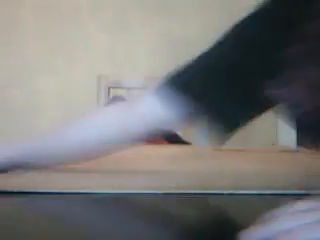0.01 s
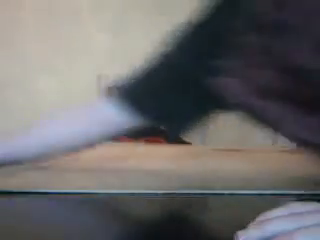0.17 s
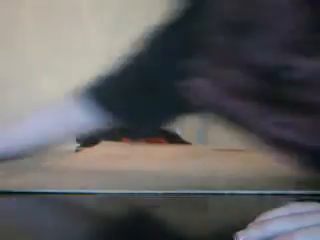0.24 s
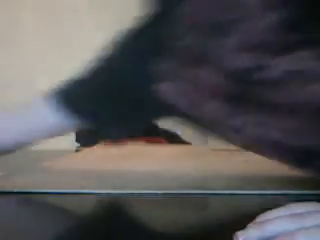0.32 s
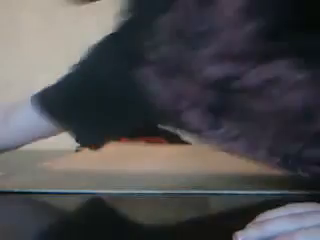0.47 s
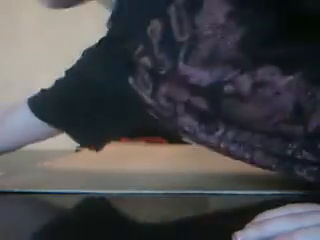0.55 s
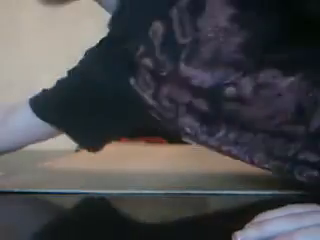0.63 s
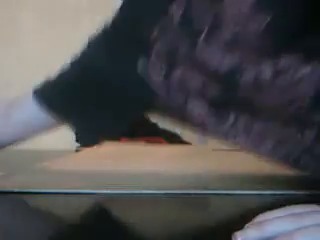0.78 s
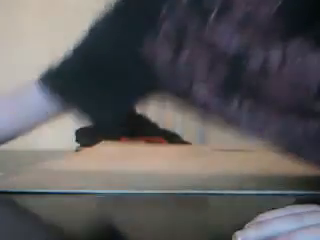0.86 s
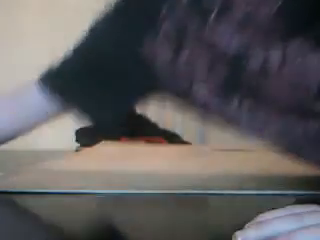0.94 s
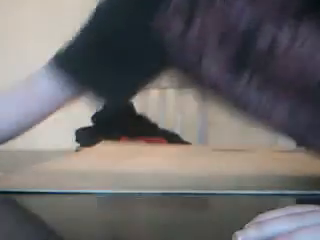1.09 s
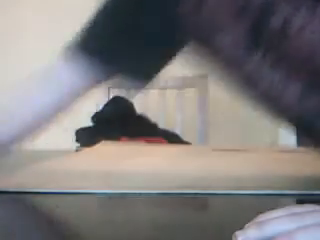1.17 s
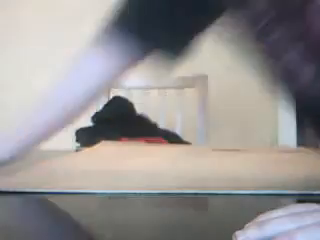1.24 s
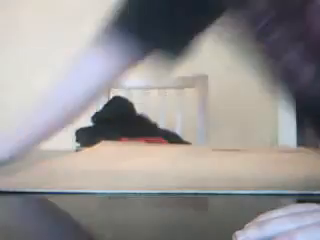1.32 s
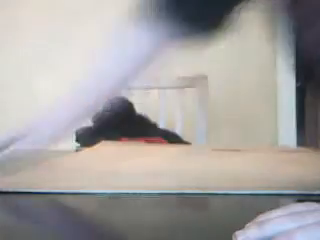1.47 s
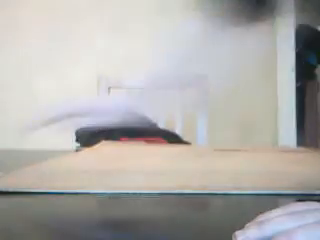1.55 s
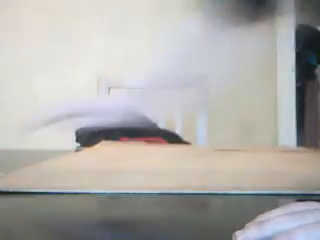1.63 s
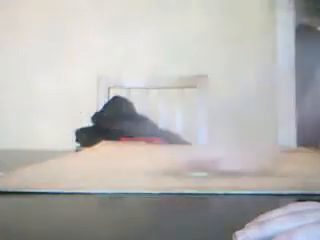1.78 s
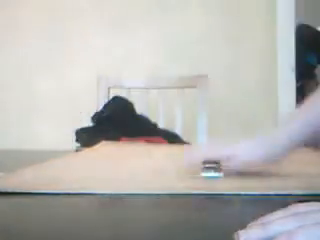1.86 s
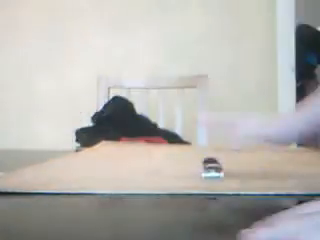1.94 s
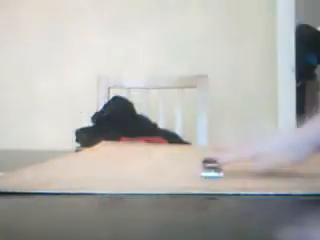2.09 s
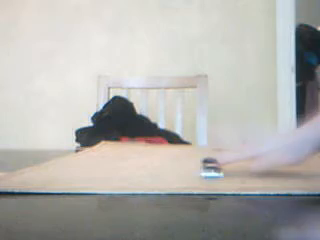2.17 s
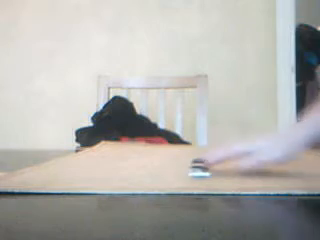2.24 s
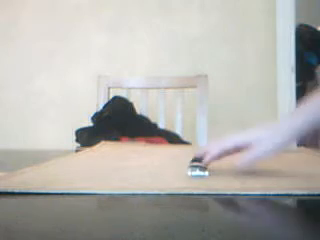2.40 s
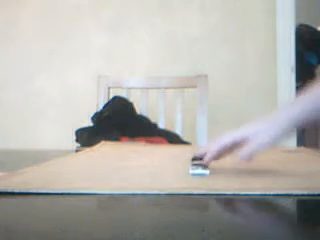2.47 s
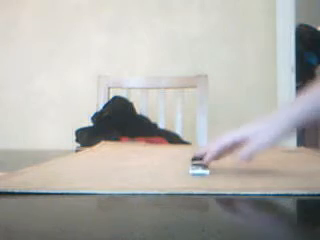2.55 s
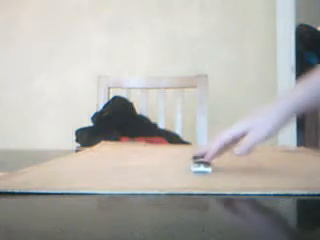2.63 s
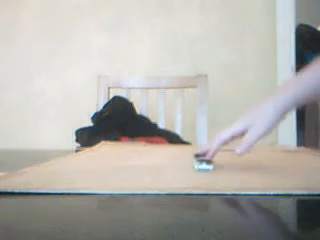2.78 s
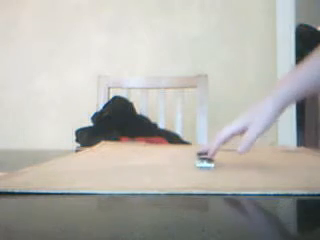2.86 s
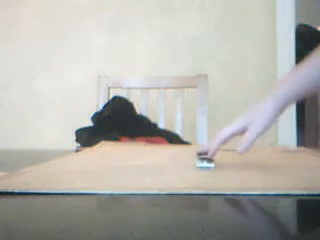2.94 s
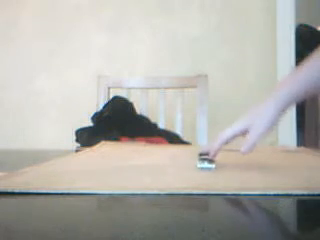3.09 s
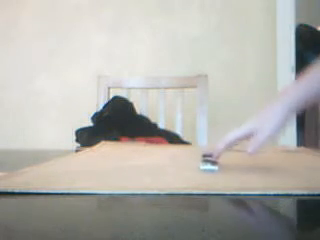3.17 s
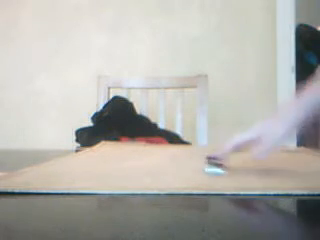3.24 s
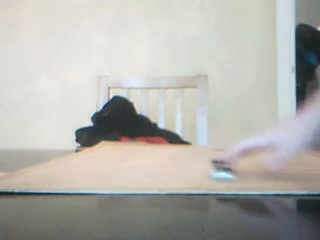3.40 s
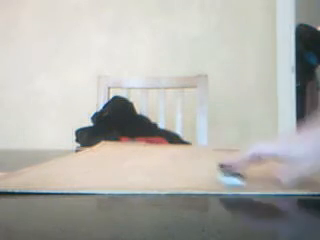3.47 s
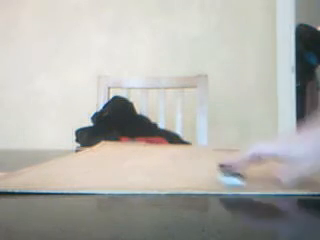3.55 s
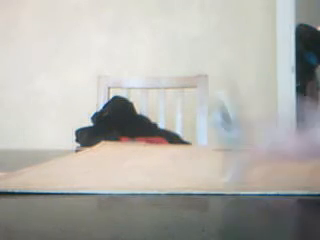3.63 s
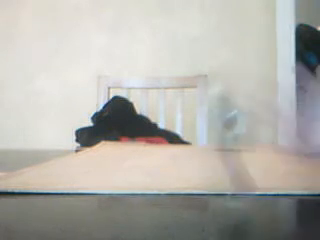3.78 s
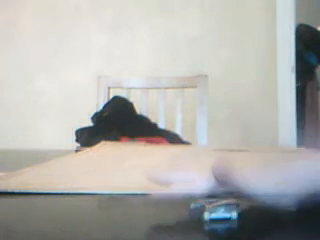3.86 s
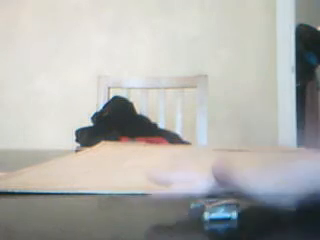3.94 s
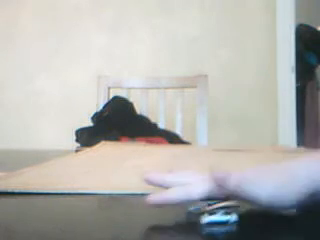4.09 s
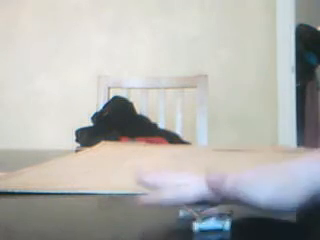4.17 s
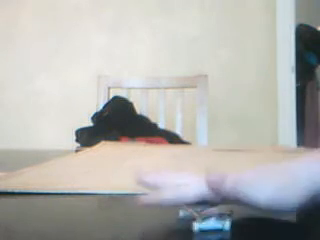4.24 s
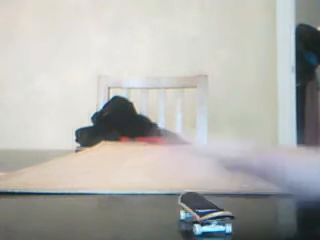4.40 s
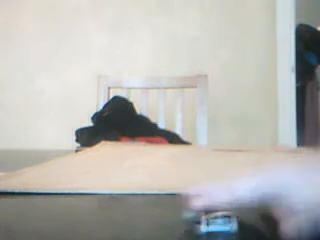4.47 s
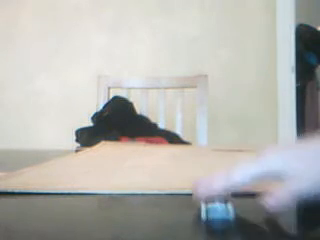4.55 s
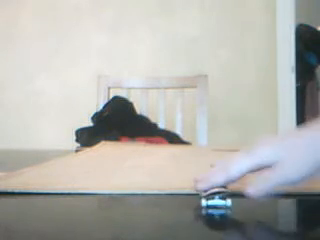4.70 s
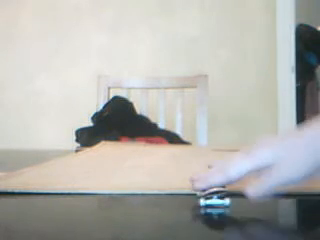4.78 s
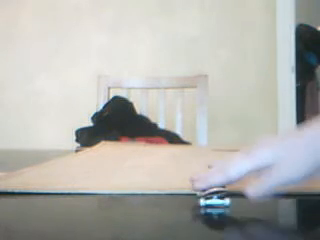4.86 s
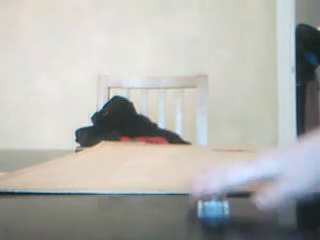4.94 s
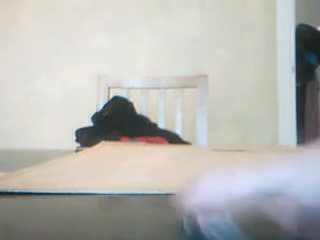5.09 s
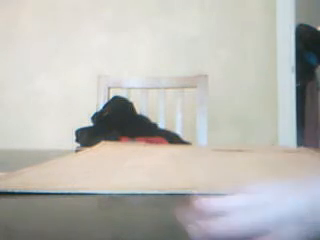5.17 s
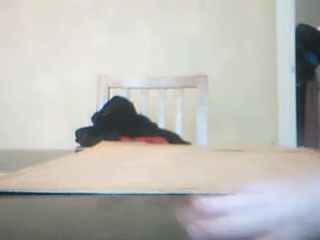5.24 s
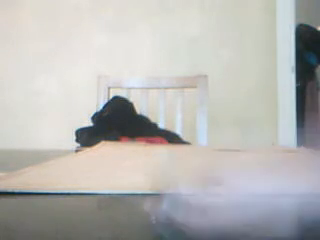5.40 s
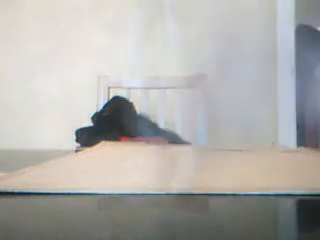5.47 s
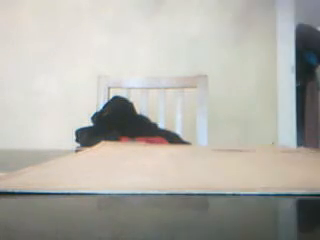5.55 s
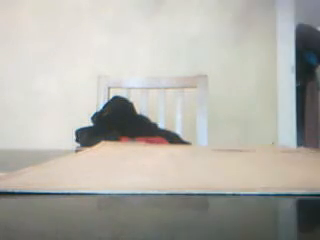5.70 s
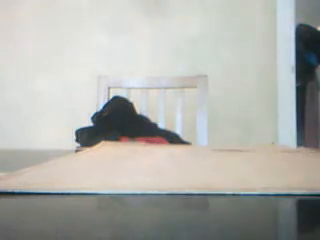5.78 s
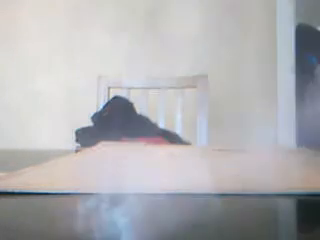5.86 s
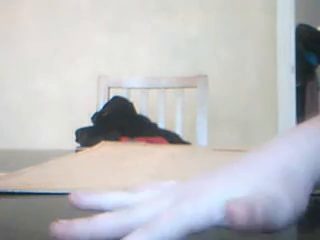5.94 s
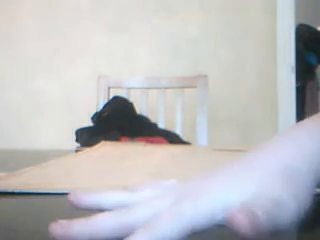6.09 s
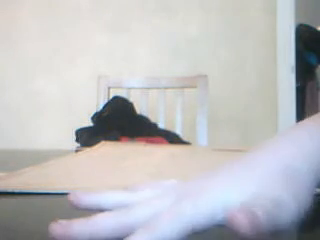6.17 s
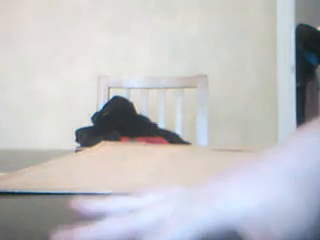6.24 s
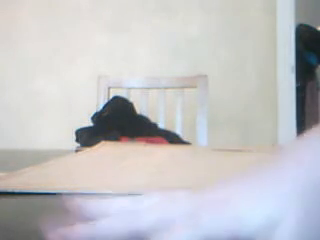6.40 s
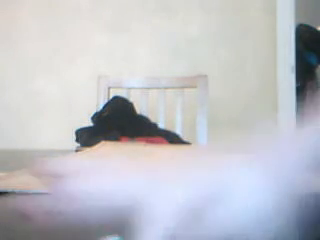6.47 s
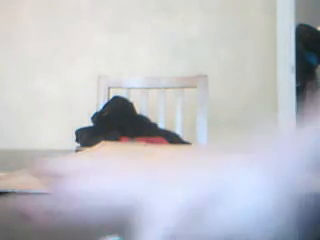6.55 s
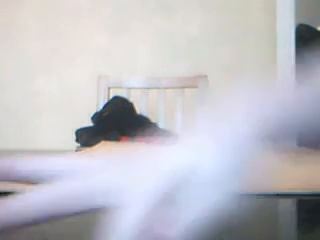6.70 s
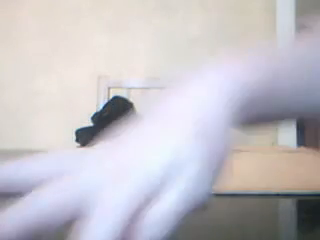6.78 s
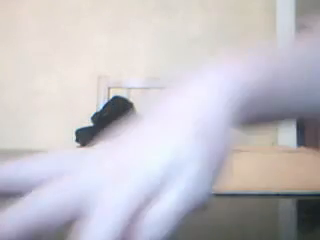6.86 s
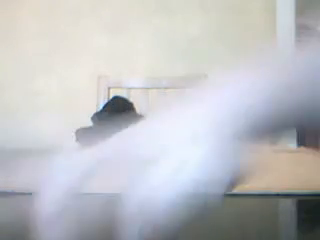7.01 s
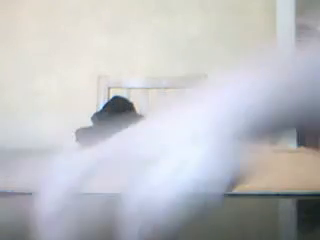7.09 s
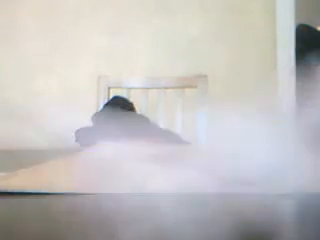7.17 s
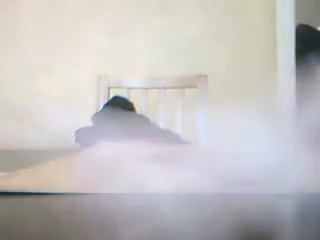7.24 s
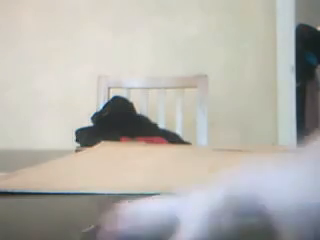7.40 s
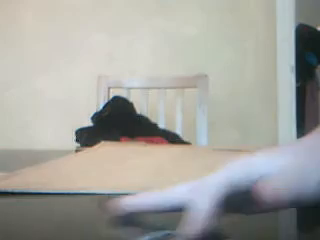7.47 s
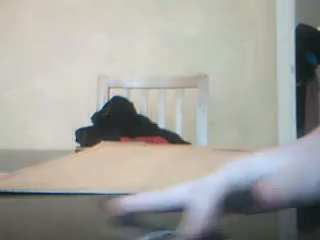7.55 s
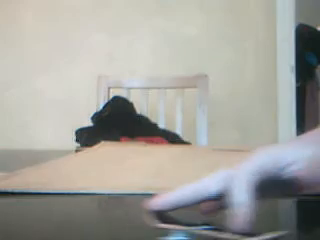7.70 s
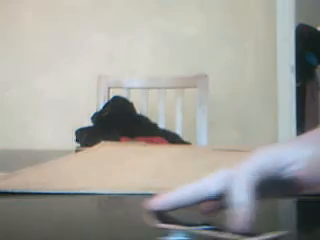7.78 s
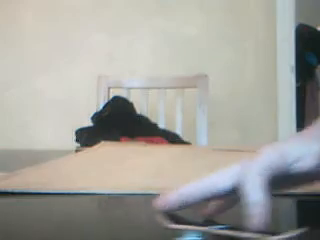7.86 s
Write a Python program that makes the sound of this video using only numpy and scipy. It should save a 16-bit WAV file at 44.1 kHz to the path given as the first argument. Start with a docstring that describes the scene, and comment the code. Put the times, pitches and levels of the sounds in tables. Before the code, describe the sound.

Small wooden toy board clacks sharply on plywood and table in a bare room, with soft wheel rubs, constant hiss and a final overloaded slam.

```python
"""A faint whine and steady hiss run throughout; early on a sleeve brushes past and a low hum swells and fades.
A toy skateboard is thrown onto plywood on a table, touched, rolled, popped and landed, then slammed down close by.
Each clack is a short bright crack with ringing wood, a table thud and the answer of a small bare room.
Hand, wheels and cloth are streams of tiny random bumps, coloured by the surface and shaped by each movement.
The little microphone adds a ring near 3 kHz to every crack and overloads on the loudest peaks."""
import sys
import numpy as np
from scipy import signal
from scipy.fft import rfft, irfft, next_fast_len
from scipy.io import wavfile

SR = 44100
rng = np.random.default_rng(int(sys.argv[2]) if len(sys.argv) > 2 else 0)


def int16_out(signal):
    """Quantize to a 16-bit WAV file."""
    q = np.round(np.clip(np.atleast_2d(signal).T, -1, 1) * 32767)
    wavfile.write(sys.argv[1], SR, q.astype(np.int16))


N = 349713
TIME = np.arange(N) / SR  # s

# steady background hiss: (frequency [Hz], relative level per Hz [dB])
AIR_COLOUR = [(30, -19), (80, -17), (200, -11), (450, -10.5), (900, -6), (1250, -7.5), (2200, -7),
              (2700, -2.5), (3130, 4), (3700, -6), (4300, -15.5), (6800, -22.5), (8000, -27),
              (10000, -54.5)]
# whine partials: (frequency [Hz], rms level before trim and flutter [dB])
WHINE_PARTIALS = [(1572, -56), (2961, -55.5), (3149, -48.5), (3564, -69.5), (3704, -60), (3795, -60)]
# room decay: (frequency [Hz], time to fall 60 dB [s])
ROOM_DECAY = [(100, 0.36), (300, 0.44), (1000, 0.4), (3000, 0.45), (6000, .37), (12000, 0.2)]
# nearest surfaces: (shortest delay [s], gain [ratio])
NEAR_ECHOES = [(.0013, 0.84), (.0068, 0.24), (.0087, .2), (0.0141, 0.08)]

# sleeve strokes; a hand touch, then wheel pushes on plywood; wheel pushes on the bare table; before trim:
# (start [s], length [s], body level [dB], hiss level [dB], growth over the stroke [dB], favoured pitch [Hz])
SLEEVE_STROKES = [(0, .07, -44, -49, -11, 980), (.62, .16, -43, -52.5, 2, 900),
                  (.745, 0.08, -43.5, -50, -1.5, 1850), (.92, 0.17, -45, -60.5, 1.5, 1900),
                  (1.375, 0.058, -72, -51.5, 4, 3000)]
PLYWOOD_STROKES = [(1.91, 0.08, -41, -49, -1, 1450), (2.42, 0.23, -43.5, -61, 3, 1250),
                   (2.86, 0.19, -44, -67, 7, 1650), (3.07, 0.19, -37.5, -62.5, 0.5, 1370),
                   (3.27, 0.16, -39, -45, 7, 1600)]
TABLE_PUSHES = [(4.24, .2, -44.5, -50.5, -1, 780), (4.78, 0.23, -41, -51.5, 11, 1090),
                (5.112, 0.069, -33, -42, 6, 1950)]
# colours of rubbing cloth, strokes on the plywood, rolling on the table, and the hiss of all three:
# (frequency [Hz], relative level per Hz [dB])
CLOTH_COLOUR = [(80, -29), (300, -5.5), (500, -8.5), (900, 3), (1400, -3.5), (2000, -4.5), (3200, -6),
                (4500, -43), (8000, -45)]
PLYWOOD_COLOUR = [(80, -31.5), (250, -6.5), (450, -7), (800, 0.5), (1400, -0.5), (2200, -3), (3050, 5.5),
                  (3800, -11), (5000, -34), (8000, -47)]
TABLE_COLOUR = [(80, -20), (450, -8.5), (600, -9.5), (720, 3), (850, -3.5), (1080, 1), (1280, -3.5),
                (1550, 4), (1800, -6), (2300, -1.5), (2750, 6), (3200, 0.5), (4000, -25), (8000, -43)]
HISS_COLOUR = [(1500, -41), (3200, 8.5), (4200, 3), (6400, -2.5), (8000, -12), (12000, -49.5)]

# one blow a row, from throw and pops to slam and pick-up ticks: (time [s], strength [dB],
# wooden body [dB], metal tick [dB], table thud [dB], room [dB], brightest ring [Hz])
BLOWS = [ (1.5361, 2, 9.5, -1, -17, -5, 2220), (1.5458, 3.5, 7, -1, -4.5, 1, 3090),
         (1.5655, -5, 1, -12, -12, -4, 3170), (3.4392, -1, 4, -5, -7.5, 2.5, 3130),
         (3.447, -3, 1, 5.5, -4, -18, 2060), (3.528, -21, 3.5, -32.5, -29, 4, 3020),
         (3.6755, -4, 1.5, -1, -3.5, 5, 3490), (3.698, -17, -16, 4, -10, 2, 4100),
         (3.7196, 2, 14, -4, -32, 0, 1560), (3.7290, 6, 4.5, 9, -29, -4, 2730),
         (4.1999, -8.5, 2, 4, -4.5, 1.5, 3060), (4.3614, -26.5, -19, 5, -11, -8, 2600),
         (5.2171, 2.5, -3, -4, -5, -6.5, 2920), (5.6849, 10.5, -11, -10, -19, 3, 3340),
         (5.6873, -1.5, -8, 12, 18, -15.5, 960), (5.7037, 4.5, -20, -8.5, 2.5, 5.5, 3510),
         (5.7229, 6, -16, -2, -22, 4.5, 3450), (5.7280, 5.5, -19, 5, 2.5, -9, 3300),
         (5.7465, 6.5, -3, 31, -11, -3.5, 3360), (5.7549, 2.5, -8, 34, -3, -10, 3480),
         (5.7690, 1.5, -17.5, -17.5, -14, -3, 3530), (6.3500, -19, -7, -6, -24, -3, 3100),
         (6.390, -20, -1, -2, -21, 2.5, 3000), (6.6606, -24, 3, -7.5, -13, -1, 5100),
         (6.8092, -10.5, -1.5, 3, -12, -5.5, 4140)]
# basic colour of the toy's crack: (frequency [Hz], level [dB])
CRACK_COLOUR = [(80, -38.5), (300, -12), (520, -31), (700, -13), (1050, -9), (1300, -8), (1950, -1.5),
                (2700, 0), (3600, 1.5), (4400, -1.5), (6600, -5.5), (8000, -13.5), (10500, -45),
                (13000, -37.5)]
# ringing of deck and plywood, then of the table top:
# (frequency [Hz], level before random spread [dB], time to fall 60 dB [s])
WOOD_MODES = [(706, -47, 0.14), (1057, -35.5, 0.068), (1516, -35, 0.031), (2163, -35, 0.04),
              (2748, -33.5, 0.047)]
TABLE_MODES = [(120, -61, .12), (256, -49, 0.24), (281.6, -37.5, 0.34), (332, -45.5, 0.63),
               (356, -45, 0.35), (438.5, -35.5, .12), (984, -34, 0.049), (1145, -24.5, 0.019)]
# overall treble colour, dull above about 8 kHz: (frequency [Hz], level [dB])
TREBLE_COLOUR = [(20, 0), (6900, -0.5), (7400, -7), (8100, -3), (8350, -18.5), (10500, -12), (11200, -21),
                 (16000, -12.5)]

AIR_DB, AIR_WAVER_DB = -44, 0.7  # hiss level and its rms wander
HUM_START_S, HUM_LENGTH_S, HUM_DB, HUM_HZ = 0.9, 0.68, -58.5, 192  # rms level at the crest
STROKE_ATTACK_S, STROKE_RELEASE_S = 0.043, 0.071  # a hand gets going and comes to rest
HISS_GROWTH = 0.68  # dB of hiss for each dB of body sound as the hand speeds up
STROKE_PEAK_DB, STROKE_PEAK_Q = -1, 2.5  # each place of contact favours one pitch
MIC_HZ, MIC_WIDTH_HZ, MIC_PEAK_DB = 3066, 670, 8  # microphone ring
CEILING, OFFSET = 0.65, -0.028  # overload amplitude, resting zero line
EDGE_HZ = 15900  # upper limit of the sound


def gain_of(db):
    """Decibels to amplitude."""
    return 10 ** (np.asarray(db) / 20)


def evened(x):
    """Scales to rms 1."""
    return x / np.sqrt(np.mean(x ** 2) + 1e-20)


def read(points, hz):
    """Reads a table on a log-frequency axis."""
    f, value = np.transpose(points)
    return np.interp(np.log(hz + 1), np.log(f), value)


def add(mix, s, sound):
    """Adds a sound to the mix at time s."""
    part = mix[round(s * SR):][:len(sound)]
    part += sound[:len(part)]


def coloured(x, spectrum):
    """Filters x by a table of (frequency [Hz], level [dB])."""
    size = next_fast_len(len(x) + 4096)
    gain = gain_of(read(spectrum, np.fft.rfftfreq(size, 1 / SR)))
    return irfft(rfft(x, size) * gain, size)[:len(x)]


def causal(db, size=4096):
    """The quickest (minimum-phase) impulse response with this gain on each frequency bin."""
    cepstrum = irfft(db * np.log(10) / 20)
    cepstrum[1:size // 2] *= 2
    cepstrum[size // 2 + 1:] = 0
    return irfft(np.exp(rfft(cepstrum)))


def drift(rate_hz):
    """Slow random wander of rms 1."""
    hz = np.fft.rfftfreq(N, 1 / SR)
    return evened(irfft(rfft(rng.standard_normal(N)) / (1 + (hz / rate_hz) ** 4), N))


def bump(hz, centre_hz, width_hz):
    """The shape of one resonance, height 1."""
    return 1 / (1 + (2 * (hz - centre_hz) / width_hz) ** 2)


def air():
    """Steady coloured noise whose level wanders slightly."""
    level = gain_of(AIR_DB + AIR_WAVER_DB * drift(3.7))
    return level * evened(coloured(rng.standard_normal(N), AIR_COLOUR))


def fan_whine(trim_db=-1, waver=0.000647, flutter_db=2.0):
    """A small fan's partials share one wavering speed, while each flutters in level by itself."""
    turns = np.cumsum(1 + waver * drift(8.2)) / SR
    whine = np.zeros(N)
    for hz, db in WHINE_PARTIALS:
        level = gain_of(db + trim_db + flutter_db * drift(10))
        whine += level * np.sin(2 * np.pi * hz * turns)
    return np.sqrt(2) * whine


def low_hum():
    """One low tone of unsteady pitch swells and fades once."""
    arch = np.sin(np.pi * np.clip((TIME - HUM_START_S) / HUM_LENGTH_S, 0, 1))
    turns = np.cumsum(1 + 0.01 * drift(14)) / SR
    return np.sqrt(2) * gain_of(HUM_DB) * arch * np.sin(2 * np.pi * HUM_HZ * turns)


def room(build_s=0.0021, dense_s=0.07, first_share=0.05):
    """Reflections arrive singly at first, then thicken and die, each band at its own speed."""
    count = SR * 3 // 5
    age = np.arange(count) / SR
    share = np.clip(first_share + (age / dense_s) ** 2, 1e-3, 1)
    taps = rng.choice([-1, 1], count) * (rng.random(count) < share) / np.sqrt(share)
    hz, t, bands = signal.stft(taps, SR, nperseg=256)
    decay = gain_of(-60 * t / read(ROOM_DECAY, hz)[:, None])
    tail = signal.istft(bands * decay, SR, nperseg=256)[1][:count]
    tail *= 1 - np.exp(-(age / build_s) ** 2)
    return tail / np.linalg.norm(tail)


def stroke(start_s, length_s, level_db, growth_db):
    """Gain of one hand movement: it eases in, grows or fades steadily, and dies away."""
    age = TIME - start_s
    attack = np.sin(np.pi / 2 * np.clip(age / STROKE_ATTACK_S, 0, 1)) ** 2
    release = np.exp(-np.maximum(age - length_s, 0) / STROKE_RELEASE_S)
    growth = growth_db * (np.clip(age / length_s, 0, 1) - 0.5)
    return attack * release * gain_of(level_db + growth)


def rubbing(strokes, body, body_trim_db, hiss_trim_db, bumps_per_s, spread_db, echo,
            echo_s=0.002156, wander=0.12):
    """Tiny bumps of uneven size shake a surface; their sharp edges hiss; the room smears both."""
    size = gain_of(spread_db * np.minimum(rng.exponential(1, N), 2)) * rng.standard_normal(N)
    bumps = size * (rng.random(N) < bumps_per_s / SR)
    bumps = bumps + signal.fftconvolve(bumps, room())[:N]
    # a near echo shifts as the contact travels
    delay = echo_s * (1 + wander * drift(1.5))
    bumps = bumps + echo * np.interp(TIME - delay, TIME, bumps)
    surface = coloured(bumps, body)
    hiss = evened(coloured(bumps, HISS_COLOUR))
    out = np.zeros(N)
    for s, length, body_db, hiss_db, growth_db, hz in strokes:
        peak = signal.lfilter(*signal.iirpeak(hz, STROKE_PEAK_Q, SR), surface)
        rumble = evened(surface + gain_of(STROKE_PEAK_DB) * peak)
        out += stroke(s, length, body_db + body_trim_db, growth_db) * rumble
        out += stroke(s, length, hiss_db + hiss_trim_db, HISS_GROWTH * growth_db) * hiss
    return out


def sleeve():
    """Dense small bumps of cloth make a soft rustle."""
    return rubbing(SLEEVE_STROKES, CLOTH_COLOUR, body_trim_db=0.5, hiss_trim_db=4.0,
                   bumps_per_s=7000, spread_db=3.5, echo=0.28)


def touch_and_wheels():
    """A hand touch, then wheels: small bumps shake the plywood and later the bare table."""
    on_plywood = rubbing(PLYWOOD_STROKES, PLYWOOD_COLOUR, body_trim_db=0.0, hiss_trim_db=-3.5,
                         bumps_per_s=1900, spread_db=3.5, echo=0.34)
    on_table = rubbing(TABLE_PUSHES, TABLE_COLOUR, body_trim_db=1.5, hiss_trim_db=3.0,
                       bumps_per_s=1100, spread_db=2.0, echo=0.71, echo_s=0.0031, wander=0.205)
    return on_plywood + on_table


def ringing(modes, t, spread_db=0.5):
    """Dying modes; the place of contact changes how much each is struck."""
    out = np.zeros(len(t))
    for hz, db, t60 in modes:
        level = gain_of(db + spread_db * rng.standard_normal())
        out += level * np.sin(2 * np.pi * hz * t) * np.exp(-np.log(1000) * t / t60)
    return out


def crack(wood_db, tick_db, ring_hz, wood_hz=2450, tick_hz=4200, ring_db=6, ring_width=0.092):
    """The sharp knock of deck and trucks: wood weights the lows, metal the highs; peak 1."""
    hz = np.fft.rfftfreq(4096, 1 / SR)
    wood = wood_db / (1 + (hz / wood_hz) ** 8)
    metal = tick_db * (1 - 1 / (1 + (hz / tick_hz) ** 10))
    ring = ring_db * bump(hz, ring_hz, ring_width * ring_hz)  # width is a share of the pitch
    microphone = MIC_PEAK_DB * bump(hz, MIC_HZ, MIC_WIDTH_HZ)
    knock = causal(read(CRACK_COLOUR, hz) + wood + metal + ring + microphone)
    return knock / abs(knock).max()


def table_push(t, push_s=0.00071, rebound=0.33):
    """The table gives way under the blow and springs back."""
    age = t / push_s
    return -0.6 * age * (1 - rebound * age) * np.exp(-age)


def clack(strength_db, wood_db, tick_db, thud_db, room_db, ring_hz, thud_room=0.34):
    """One blow: a crack, ringing wood, a push on the table, and the room's answer."""
    tail = gain_of(room_db) * room()
    t = np.arange(len(tail)) / SR
    blow = gain_of(wood_db) * ringing(WOOD_MODES, t)
    add(blow, 0, crack(wood_db, tick_db, ring_hz))
    push = table_push(t)
    near = blow + gain_of(thud_db) * (push + ringing(TABLE_MODES, t))
    for delay, gain in NEAR_ECHOES:  # the toy moves, so the echo paths differ from blow to blow
        add(near, delay * rng.uniform(1.0, 1.3), gain * blow)
    into_room = blow + thud_room * gain_of(thud_db) * push
    far = signal.fftconvolve(into_room, tail)[:len(t)]
    return gain_of(strength_db) * (near + far)


def clacks():
    """All the toy's blows, each struck at its own time."""
    out = np.zeros(N)
    for s, *blow in BLOWS:
        add(out, s, clack(*blow))
    return out


def scene():
    """Background, sleeve, hand touch, wheels and clacks in one channel."""
    background = air() + fan_whine() + low_hum()
    return (background + sleeve() + touch_and_wheels() + clacks())[None]


def record(dry, lopsided=0.04, overload_hz=420):
    """The microphone thumps and clips on loud peaks; the top is dull; the zero line sits low."""
    excess = np.maximum(abs(dry[0]) - CEILING, 0)
    # the diaphragm yields more one way than the other, so heavy ringing becomes a low thump
    band = signal.butter(2, [25, overload_hz], "bandpass", fs=SR, output="sos")
    pressure = dry[0] - lopsided * signal.sosfilt(band, excess)
    clipped = pressure / (1 + (pressure / CEILING) ** 6) ** (1 / 6)
    edge = signal.firwin(511, EDGE_HZ, window=("kaiser", 9), fs=SR)
    return signal.oaconvolve(coloured(clipped, TREBLE_COLOUR), edge, "same")[None] + OFFSET


dry = scene()
out = record(dry)
int16_out(out)
```